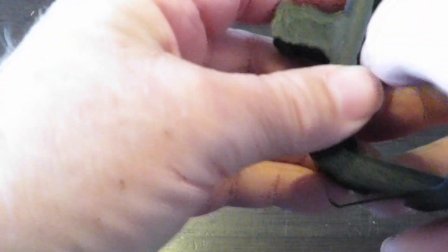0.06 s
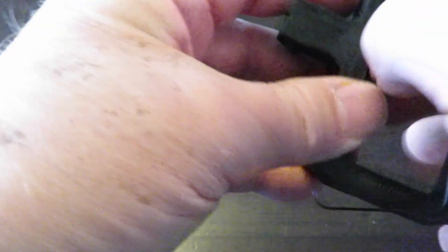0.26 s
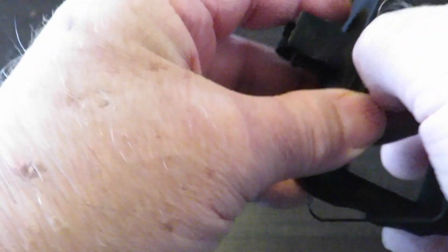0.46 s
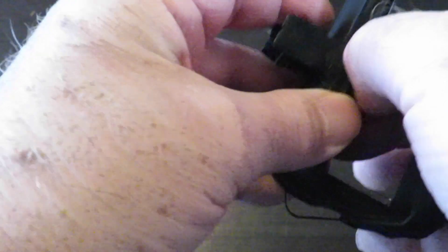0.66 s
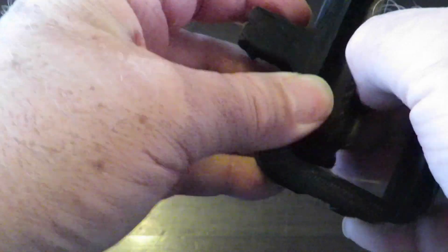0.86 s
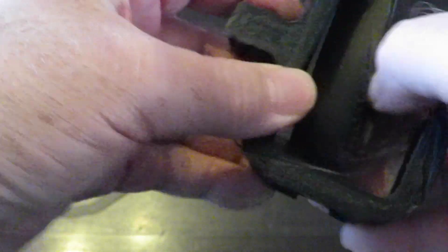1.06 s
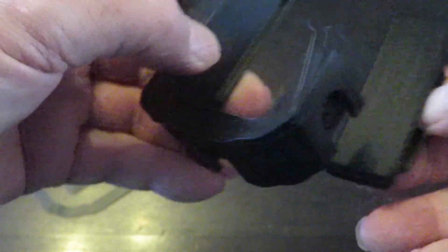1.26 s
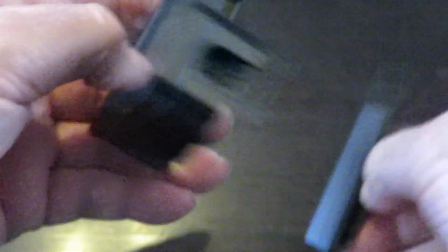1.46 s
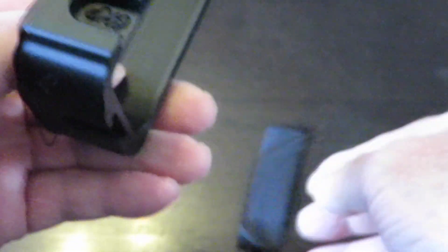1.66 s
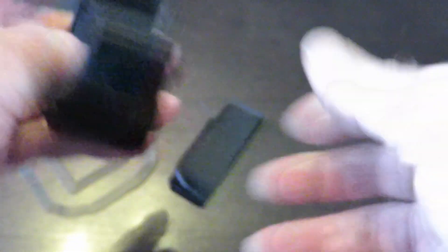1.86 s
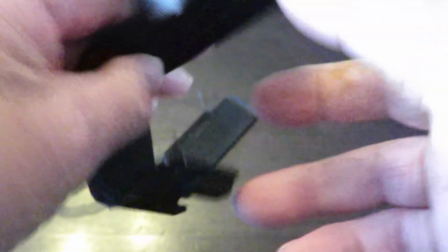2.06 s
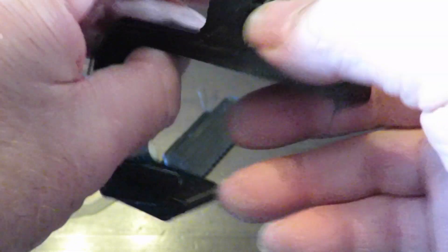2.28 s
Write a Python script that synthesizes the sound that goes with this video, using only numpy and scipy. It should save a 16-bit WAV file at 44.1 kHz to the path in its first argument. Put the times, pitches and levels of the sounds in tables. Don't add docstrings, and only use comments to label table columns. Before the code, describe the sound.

Loud, dry plastic snaps come first in uneven clusters, followed by a short gritty scrape as a piece works loose, a quick rattle on the table, then soft rubbing and thin squeaks; close microphone, short room reflections, low handling rustle.

```python
import sys
import numpy as np
from scipy import signal
from scipy.fft import rfft, irfft, next_fast_len
from scipy.io import wavfile
from scipy.ndimage import map_coordinates

SR = 44100
rng = np.random.default_rng(int(sys.argv[2]) if len(sys.argv) > 2 else 0)


def unload_wav(signal):
    wavfile.write(
        sys.argv[1],
        SR,
        np.round(np.clip(np.atleast_2d(signal).T, -1, 1) * 32767).astype(np.int16),
    )


def gain_from_decibels(decibels):
    exponent = np.asarray(decibels, float) / 20
    return 10 ** exponent


N = 102223

# freq_hz, density_db [dB per Hz]
AIR_MID = [(15, -42), (25, -21), (78, -8), (114, -10.5), (195, -17.5), (863, -19), (1840, -19),
           (11600, -39), (16000, -57)]
# freq_hz, density_db [dB per Hz]
AIR_SIDE = [(15, -31), (30, -12.5), (80, -18), (300, -15), (900, -36.5), (2500, -26), (11000, -43.5),
            (16000, -62)]
# start_s, level_db
HAND_MOVES = [
    (0, -53),
    (.3, -62.5),
    (.9, -62.5),
    (1.1, -67.5),
    (1.5, -59.5),
    (1.72, -62.5),
    (1.9, -55.5),
    (2.32, -58),
]
# freq_hz, density_db [dB per Hz]
RUSTLE = [(100, -10.5), (200, -5.5), (330, -1.5), (500, -5), (900, -12.5), (2000, -13.5), (6000, -33.5)]
# freq_hz, t60_s
ROOM_DECAY = [(200, 0.16), (1000, 0.18), (3000, 0.25), (8000, 0.23), (14000, 0.14)]
# freq_hz, side_over_mid_db
ROOM_WIDTH = [(300, 0.5), (1500, -19), (4000, -9.5), (12000, -0.5)]
# delay_s, level_db
ECHOES = [(.0075, -19.5), (0.013, -21)]
# freq_hz, width_hz, level_db
TABLE_MODES = [(122.6, 41, -8.5), (230, 63, -7.5), (330, 15, 11), (439, 18, 3), (587, 36, 0),
               (769, 50, -5.5)]
# start_s, level_db
KNOCKS = [
    (1.756, -34.5),
    (1.785, -30),
    (1.799, -32.5),
    (1.815, -36),
    (1.864, -44.5),
    (1.885, -38.5),
    (1.942, -40.5),
    (2.196, -43.5),
]
# start_s, level_db
JOLTS = [
    (.381, -36.5),
    (.437, -45),
    (.609, -46.5),
    (.714, -26),
    (.795, -33.5),
    (.894, -27),
    (1.212, -38),
    (1.26, -39),
]
# start_s, level_db, pitch_hz
SQUEAK = [(2.03, -60, 2230), (2.058, -54.5, 2289), (2.086, -46, 2289), (2.106, -56.5, 2270),
          (2.128, -68, 2200), (2.152, -58.5, 2272), (2.196, -64, 2260), (2.214, -52, 2284),
          (2.264, -46, 2294), (2.302, -54, 2285), (2.318, -66, 2240)]
# freq_hz, level_db
SQUEAK_PARTNERS = [(2650, -18), (3620, -23), (1913, -19)]
# freq_hz, width_hz, level_db
PART_MODES = [(800, 120, -20), (1407, 150, -4), (1706, 130, -6), (2490, 100, -17.5), (2930, 200, -10.5),
              (3525, 130, -3.5), (4297, 150, -6), (5350, 450, -7), (7200, 300, -20), (11000, 1500, -18),
              (12070, 1500, -15)]
# freq_hz, level_db
CRACKLE = [(60, -61.5), (500, -26), (1500, -16), (4000, -7.5), (8000, -11), (12500, -12), (15000, -19.5)]
# start_s, peak_db, crackle_db, mode_hz, stroke_ms
SCRAPES = [(.300, -39, 1, 2383, 70), (1.2345, -18.5, -6, 1950, 15), (1.250, -16, -8, 2203, 14),
           (1.2345, -27, -11, 813, 33), (1.238, -25.5, -8, 2600, 46), (1.245, -29.5, -2, 4500, 45),
           (1.470, -51.5, 2, 4500, 42), (1.535, -40, 1, 4840, 29), (1.602, -32.5, -10, 1650, 38),
           (1.803, -22, -1, 3080, 62), (1.790, -31, -3, 910, 53), (1.890, -30, 6, 3000, 45),
           (1.888, -32.5, 2, 1350, 107), (2.210, -46.5, -1.5, 3400, 126)]
# start_s, peak_db, crackle_db, mode_hz, second_mode_hz
DROPS = [
    (1.7562, -20, 0.5, 3520, 833),
    (1.759, -21, -6, 2350, 1586),
    (1.783, -11.5, -2.5, 2700, 1730),
    (1.785, -13, -4.5, 3750, 900),
    (1.7978, -10.5, -7.5, 3520, 4800),
    (1.800, -18, -10.5, 1805, 800),
    (1.8843, -17, -4.5, 3070, 4690),
    (1.886, -21.5, -8.5, 1648, 1000),
    (1.9425, -17.5, -11.5, 5120, 3050),
]
# start_s, peak_db, crackle_db, mode_hz
TICKS = [(.131, -35, 1.5, 1572), (.249, -33.5, -2.5, 3030), (.325, -44, -11, 2380),
         (.366, -30.5, -10, 1700), (.467, -18.5, 6, 4300), (.5875, -24, -3, 3604), (.5915, -19.5, 0, 3810),
         (.5975, -19, -5, 3990), (.7005, -29, -2, 5270), (.723, -8.5, -7.5, 11470),
         (.7245, -19, -3.5, 1690), (.751, -21.5, -8.5, 3600), (.776, -14, -1, 4200), (.8195, -21, 10, 4300),
         (.827, -25.5, 14.5, 10030), (.885, -25, 1, 5350), (.986, -38, -15, 752), (1.145, -39.5, -14, 1640),
         (1.155, -35.5, -11, 1743), (1.495, -46.5, -11, 3780), (1.534, -37, -12, 944),
         (1.634, -30.5, -7, 880), (1.648, -34.5, 10, 10300), (1.863, -24.5, -5.5, 3060),
         (1.900, -27, 0, 4990), (1.909, -32, -8, 1510), (1.958, -31, -3, 4470), (1.969, -27.5, -3, 5100),
         (2.165, -40, 1, 6950), (2.181, -47.5, 3, 6500), (2.313, -43.5, -3, 5140),
         (2.188, -41, -15.5, 3800), (2.196, -44, -12, 1700), (2.243, -34.5, 0, 10600),
         (.1438, -19, -20, 600), (2.236, -44, 4, 12500), (.2505, -40, 8, 9000)]
# start_s, peak_db, crackle_db, mode_hz, second_mode_hz
SNAPS = [(.0005, 0, 2, 1406, 3480), (.0285, -9, 5, 3258, 1020), (.1436, -1.5, 1.5, 5300, 7510),
         (.1436, 4.5, -16, 1470, 2993), (.1472, -11, -18, 2993, 1392), (.3803, -3, -1.5, 1500, 1050),
         (.437, -1, -5, 3500, 2250), (.5025, -12.5, -4.5, 4300, 5350), (.5698, -8.5, 3.5, 1490, 5600),
         (.5726, -7, 0, 3850, 3600), (.5762, -13, 0, 1450, 2300), (.609, -23.5, -1, 800, 1460),
         (.7135, -4, 1, 3510, 4760), (.7145, -14.5, -15, 790, 1750), (.7405, -6, -4, 1940, 3650),
         (.744, -7.5, -0.5, 3500, 1720), (.7945, -5.5, -1.5, 1910, 4700), (.894, 1, -2, 1710, 713),
         (1.2105, -20.5, -16.5, 3860, 1750), (1.2598, -16, -2, 2335, 4420),
         (1.2605, -21.5, -11.5, 5200, 2800)]

SPAN = 2 ** 14
F = np.fft.rfftfreq(SPAN, 1 / SR)
LEAD_S = 0.008
CONTACT_T = np.arange(SR // 9) / SR - LEAD_S
BURST_S = 0.0018
SECOND_DB = -4


def unit(x):
    return x / np.sqrt(np.mean(x ** 2) + 1e-20)


def along(points, hz):
    f, v = np.transpose(points)
    return np.interp(np.log(hz + 1), np.log(f + 1), v)


def wobble(rate):
    knots = rng.standard_normal(int(N * rate / SR) + 4)
    return map_coordinates(knots, [np.arange(N) * rate / SR])


def noise(points):
    m = next_fast_len(N)
    white = rfft(rng.standard_normal(m))
    return unit(irfft(white * gain_from_decibels(along(points, np.fft.rfftfreq(m, 1 / SR))), m)[:N])


def resonance(hz, width):
    return 1j * F * width / (hz * hz - F * F + 1j * F * width)


def steep_resonance(hz, width):
    return resonance(hz, width) * resonance(hz, 2 * width)


def delayed(s):
    return np.exp(-2j * np.pi * F * s)


def add(out, s, x):
    i = round(s * SR)
    out[:, i:i + x.shape[1]] += x


def room_tail():
    chance = rng.standard_normal((2, 2, 129, 88))
    hz, t = np.fft.rfftfreq(256, 1 / SR), np.arange(88) * 128 / SR
    decay = gain_from_decibels(-60 * t / along(ROOM_DECAY, hz)[:, None])
    tail = signal.istft((chance[0] + 1j * chance[1]) * decay, SR, nperseg=256)[1]
    t = np.arange(tail.shape[1]) / SR
    delay_s, rise_s = 0.0013, 0.0025
    tail = tail * (1 - np.exp(-np.maximum(t - delay_s, 0) / rise_s))
    return rfft(gain_from_decibels(-12.5) * tail / np.linalg.norm(tail[0]), SPAN) * [F * 0 + 1, gain_from_decibels(along(ROOM_WIDTH, F))]


def in_room(near, far):
    echoes = [gain_from_decibels(db) * delayed(s) for s, db in ECHOES]
    side = gain_from_decibels(-6.5) * delayed(0.00045)
    side = side + sum((-1) ** k * echo for k, echo in enumerate(echoes))
    direct = np.array([1 + sum(echoes), gain_from_decibels(along(ROOM_WIDTH, F)) * side])
    return irfft(near * direct + far * room_tail(), SPAN)


def room_floor():
    air = gain_from_decibels(-69) * np.array([noise(AIR_MID), gain_from_decibels(-9.5) * noise(AIR_SIDE)])
    level_db = np.interp(np.arange(N) / SR, *np.transpose(HAND_MOVES)) + 0.83 * wobble(25)
    hands = gain_from_decibels(level_db) * np.array([noise(RUSTLE), gain_from_decibels(1) * noise(RUSTLE)])
    return air + hands


def thumps(rows, modes, side):
    out = np.zeros((2, N + SPAN))
    ring = sum((-1) ** k * gain_from_decibels(db) * resonance(hz, width) for k, (hz, width, db) in enumerate(modes))
    ring = ring * resonance(260, 1500)
    ring = ring / np.abs(irfft(ring, SPAN)).max()
    for s, db in rows:
        x = gain_from_decibels(db) * in_room(ring, ring)
        add(out, s, x + [0 * x[0], side * x[0]])
    return out[:, :N]


def squeak_tone(hz, db):
    level = gain_from_decibels(db + 4 * wobble(60))
    drifting_hz = hz + 16.2 * wobble(40)
    return level * np.sin(2 * np.pi * np.cumsum(drifting_hz) / SR)


def squeak():
    t, (s, level_db, pitch_hz) = np.arange(N) / SR, np.transpose(SQUEAK)
    fade = np.clip((t - s[0]) / 0.0084, 0, 1) * gain_from_decibels(np.interp(t, s, level_db))
    tones = squeak_tone(np.interp(t, s, pitch_hz), 0)
    tones = tones + sum(squeak_tone(hz, db) for hz, db in SQUEAK_PARTNERS)
    x = np.sqrt(2) * fade * tones
    return np.array([x, 0.19 * x])


def part_body(own, crackle_db, burst_s, focus_hz):
    scatter = rng.standard_normal(len(PART_MODES))
    late = LEAD_S + rng.random(len(PART_MODES) + 2) * burst_s / 2
    struck = rung = 0
    for k, hz in enumerate(own):
        kick = gain_from_decibels(SECOND_DB * k) * delayed(late[k])
        struck = struck + kick * steep_resonance(hz, focus_hz * np.sqrt(hz / 1500))
        rung = rung + gain_from_decibels(-13) * kick * resonance(hz, 60.3)
    for (hz, width, db), chance, delay in zip(PART_MODES, scatter, late[2:]):
        if min(abs(hz - favoured) for favoured in own) > width:
            level = gain_from_decibels(db + crackle_db + 1 + 2.5 * chance)
            rung = rung + level * steep_resonance(hz, width) * delayed(delay)
    return struck, rung, gain_from_decibels(crackle_db) * gain_from_decibels(along(CRACKLE, F))


def burst_of(grain, shape):
    return rfft(grain * shape / np.linalg.norm(grain * shape), SPAN)


def place(out, s, peak_db, near, far):
    gain = gain_from_decibels(peak_db) / np.abs(irfft(near, SPAN)).max()
    add(out, s, gain * in_room(near, far))


def without_lead(out):
    return out[:, round(LEAD_S * SR):][:, :N]


def rubs(rows):
    out, t = np.zeros((2, N + 2 * SPAN)), CONTACT_T
    for s, peak_db, crackle_db, mode_hz, stroke_ms in rows:
        grain, grit = rng.standard_normal(len(t)), rng.exponential(size=len(t) // 32 + 1)
        struck, rung, crackle = part_body([mode_hz], crackle_db, BURST_S, focus_hz=420 * 0.52)
        u = np.maximum(t, 0) / (stroke_ms / 1000)
        stroke = u ** 0.25 * np.exp(-u ** 6) * gain_from_decibels(2.5 * np.repeat(grit, 32)[:len(t)])
        rub = burst_of(grain, stroke) * (np.abs(struck + rung) + crackle)
        rub = rub / (1 + (F / 5970) ** 2) / (1 + (200 / (F + 1)) ** 2)
        place(out, s, peak_db, rub, rub)
    return without_lead(out)


def cracks(rows, burst_s=BURST_S, wet_db=0, creak_db=-24.5):
    out, t, creak_s = np.zeros((2, N + 2 * SPAN)), CONTACT_T, 0.0033
    swell = (t < 0) * np.exp(t * (t < 0) / creak_s) / np.sqrt(creak_s * SR / 2)
    u = np.maximum(t, 0) / burst_s
    for s, peak_db, crackle_db, *own in rows:
        grain = rng.standard_normal(len(t))
        struck, rung, crackle = part_body(own, crackle_db, burst_s, focus_hz=420)
        burst = burst_of(grain, np.sqrt(u) * np.exp(-u ** 2))
        body = struck + rung
        creak = gain_from_decibels(creak_db) * rfft(grain * swell, SPAN) * (np.abs(body) + crackle)
        near = body + burst * crackle + creak
        far = np.abs(gain_from_decibels(-3.5) * struck + rung) + crackle
        far = far * np.abs(burst) ** 0.79 * delayed(LEAD_S)
        place(out, s, peak_db, near, gain_from_decibels(wet_db) * far)
    return without_lead(out)


def scene():
    low = thumps(KNOCKS, TABLE_MODES, side=0.067) + thumps(JOLTS, [(257, 450, 0)], side=-0.4)
    piece = rubs(SCRAPES) + cracks(DROPS, burst_s=0.003, wet_db=8, creak_db=-50.5)
    ticks = cracks(TICKS, burst_s=0.00202, wet_db=7)
    mid, side = room_floor() + squeak() + low + piece + ticks + cracks(SNAPS)
    return np.array([mid + side, mid - side])


def top_cut(x):
    return signal.sosfilt(signal.butter(12, 16200, fs=SR, output="sos"), x)


def record(dry):
    x = signal.lfilter(*signal.butter(6, 14600, fs=SR), dry)
    top, knee = 0.99, 12
    x = x / (1 + np.abs(x / top) ** knee) ** (1 / knee)
    x = signal.lfilter(*signal.butter(2, 44.96, "high", fs=SR), x)
    return top_cut(x)


dry = scene()
out = record(dry)
unload_wav(out)
```